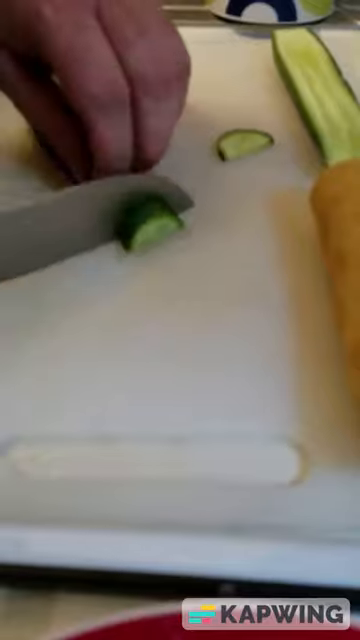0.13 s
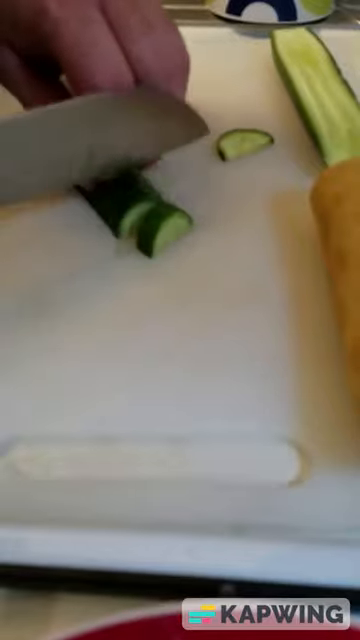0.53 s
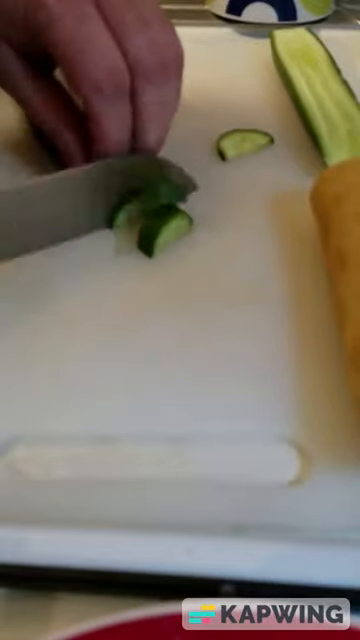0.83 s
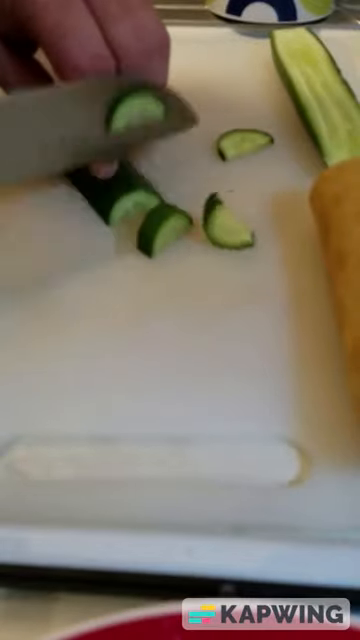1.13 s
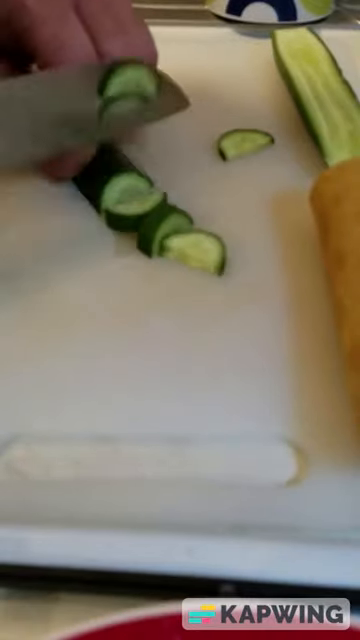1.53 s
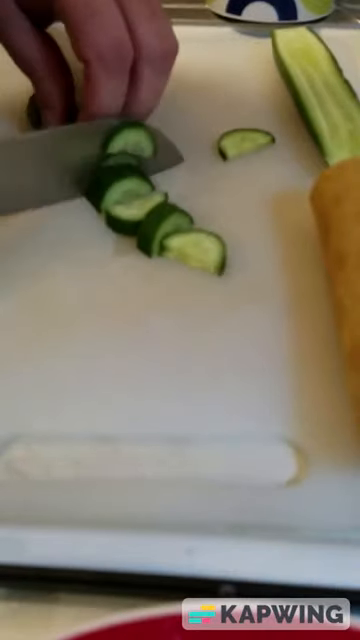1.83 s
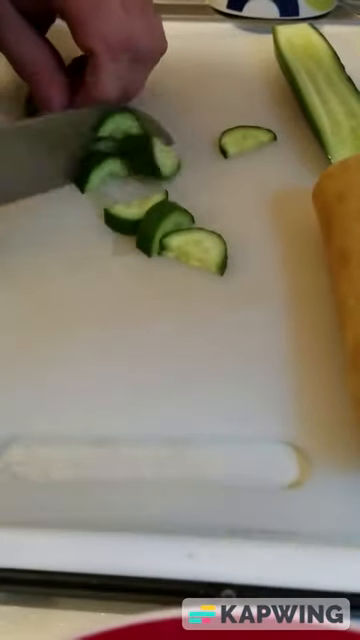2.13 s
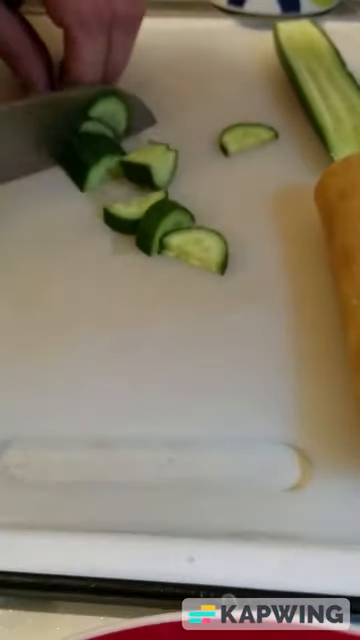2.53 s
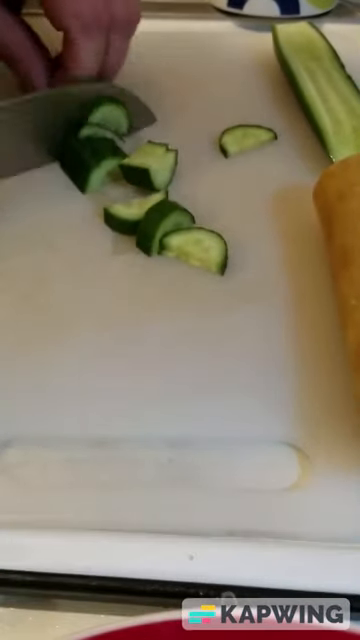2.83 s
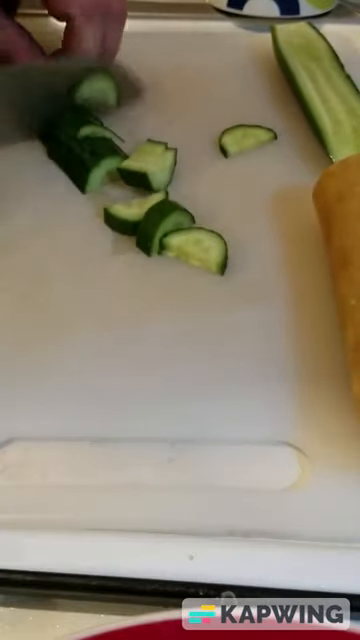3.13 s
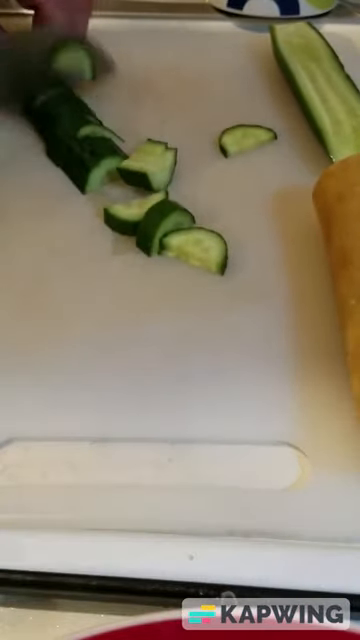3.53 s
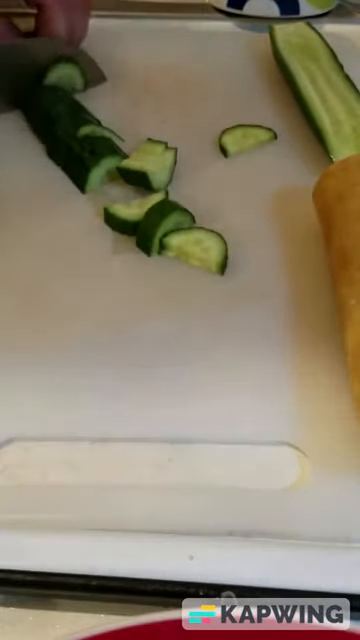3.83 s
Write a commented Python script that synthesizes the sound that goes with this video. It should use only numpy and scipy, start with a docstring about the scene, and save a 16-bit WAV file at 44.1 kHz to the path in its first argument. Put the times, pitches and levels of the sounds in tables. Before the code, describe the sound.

Knife strokes through cucumber land on a plastic cutting board with sharp woody knocks and soft low thumps, speeding up, with crunchier skin snaps later; close stereo microphones, small room, very faint hush.

```python
"""A kitchen knife chops a cucumber on a plastic board, twenty-one strokes that speed up. In each stroke grainy
noise slices crisply through the flesh, with a short soft tock on the board, then clicks, decaying modes and
ringing noise knock on the board, and more grainy noise snaps the last skin. A low sine thumps on the counter, a
small kitchen of decaying noise rings after it, and the blade skims and touches lightly between strokes over a
faint hush."""
import sys
import numpy as np
from scipy import signal
from scipy.io import wavfile

SR = 44100
rng = np.random.default_rng(int(sys.argv[2]) if len(sys.argv) > 2 else 0)


def output_pcm(signal):
    """Save a mono or channel-first signal as 16-bit PCM at the path in sys.argv[1].

    Samples are clipped to [-1, 1] before scaling.
    """
    pcm = np.clip(np.atleast_2d(signal).T, -1, 1) * 32767
    wavfile.write(sys.argv[1], SR, np.round(pcm).astype(np.int16))


N = 176400
AGE = np.arange(int(.4 * SR)) / SR  # seconds since a sound began


def from_db(db):
    """Decibels to gain."""
    return 10 ** (np.asarray(db) / 20)


def at_hz(table, hz, axis=1):
    """Read a table's column on a log-frequency axis."""
    table = np.array(table)
    return np.interp(np.log(hz), np.log(table[:, 0]), table[:, axis])


def decay(t60):
    """Exponential fall by 60 dB in t60 seconds."""
    return np.exp(-np.log(1000) * AGE / t60)


def rise(seconds):
    """Smooth attack with this time constant."""
    return 1 - np.exp(-AGE / seconds)


def swell(length):
    """A bell-shaped level that peaks halfway through the length in seconds."""
    return np.exp(-(2 * AGE / length - 1) ** 2)


def tone(hz, lag=0):
    """A sine, held back by lag radians."""
    return np.sin(2 * np.pi * hz * AGE - lag)


def add(track, s, sound):
    """Mix a sound in at time s."""
    i = int(s * SR)
    track[:, i:i + len(AGE)] += sound[..., :max(N - i, 0)]


def delayed(x, seconds):
    """The same signal, later."""
    i = np.arange(len(x))
    return np.interp(i - np.round(seconds * SR), i, x, left=0)


def highpass(x, order, hz):
    """Remove what lies below hz; the tiny offset keeps the filter out of denormal numbers."""
    return signal.sosfilt(signal.butter(order, hz, "high", fs=SR, output="sos"), x + 1e-18)


# How alike left and right are in scattered sound. Each row: frequency in Hz, correlation.
LEFT_RIGHT_LIKENESS = [(35, -1), (120, 0.75), (300, 0.81), (580, 0.79), (800, 0.39), (1150, -0.38),
                       (1900, -0.074), (4000, -.05), (12000, 0.48)]


def noise_bands(spectrum, size):
    """Bands of stereo noise, about half an octave wide, as (Hz, band), together of rms 1."""
    edges = np.geomspace(30, 17000, 20)
    centres = np.sqrt(edges[1:] * edges[:-1])
    power = from_db(at_hz(spectrum, centres)) ** 2 * np.diff(edges)
    white = rng.standard_normal((2, 2, size))
    bands = []
    for k, hz in enumerate(centres):
        bandpass = signal.butter(2, edges[k:k + 2], "band", fs=SR, output="sos")
        mid, side = signal.sosfilt(bandpass, white[k % 2])  # neighbours use separate noise
        alike = np.clip(at_hz(LEFT_RIGHT_LIKENESS, hz), -1, 1)
        band = np.sqrt(1 + alike) * mid + np.sqrt(1 - alike) * side * [[1], [-1]]
        bands.append((hz, band / band.std() * np.sqrt(power[k] / power.sum())))
    return bands


def noise(spectrum):
    """Steady stereo noise, long enough for a last stroke to ring out."""
    return sum(band for _, band in noise_bands(spectrum, N + len(AGE)))


def piece(x, s):
    """One stroke's length of a signal, from time s."""
    return x[:, int(s * SR):int(s * SR) + len(AGE)]


def grains(spread_db):
    """Cells burst at random, each with its own strength, over a smooth rub; rms 1."""
    grains_per_s, grain_s, smooth_share = 1100, 0.00058, .45
    sizes = from_db(spread_db * np.clip(rng.standard_normal(len(AGE)), -2.5, 2.5))
    bursts = sizes ** 2 * (rng.random(len(AGE)) < grains_per_s / SR)
    power = signal.lfilter([1], [1, -np.exp(-2 / (grain_s * SR))], bursts + 1e-18)
    return np.sqrt(smooth_share + (1 - smooth_share) * power / power.mean())


def lean_left(x):
    """Set a cutting sound slightly to the left, by half a dB up and half a dB down."""
    return x * from_db([[0.5], [-0.5]])


# Spectrum of the background hush. Each row: frequency in Hz, relative density in dB per Hz.
HUSH_SPECTRUM = [(30, -21), (55, 10.5), (130, 2), (300, 7.5), (1000, -31), (4000, -27.5), (14000, -20)]


def hush():
    """Steady, mostly low noise that fades in just before the first stroke."""
    level_db, start_s, fade_s = -58, .13, .04
    fade = np.clip((np.arange(N) / SR - start_s) / fade_s, 0, 1)
    return from_db(level_db) * noise(HUSH_SPECTRUM)[:, :N] * fade


# The strokes, for slices, knocks, thumps and crunches; each layer adds its own gain to the levels.
# Each row: time of the knock in seconds, slicing before it in seconds, slice level in dB, thump level in dB,
# knock level in dB in its deep, low, mid and high band, crunch level in dB, pitch of the edge's click in Hz.
STROKES = [(0.1546, 0.0039, -39.5, -43, -33, -26, -25.5, -28, -64, 1304),
           (0.4053, 0.014, -42.5, -37, -24.5, -23, -20.5, -24.5, -43.5, 1280),
           (0.6321, 0.015, -43, -37, -24.5, -23.5, -18, -22, -41.5, 1340.0),
           (0.8416, 0.016, -41.5, -46, -24, -21.5, -19.5, -20, -37.5, 1350),
           (1.0405, 0.014, -41, -43.5, -24.5, -25.5, -19.5, -26, -42, 1140),
           (1.2592, 0.018, -44.5, -41, -24, -19.5, -18, -18.5, -37.5, 1470),
           (1.4514, 0.02, -42, -41, -27.5, -26.5, -20.5, -23.5, -44, 1500.0),
           (1.6293, 0.016, -42.5, -42, -27, -29.5, -18.5, -24, -39, 1500),
           (1.821, 0.016, -37.5, -41, -26.5, -23.5, -18.5, -23, -35.5, 1560.0),
           (1.9923, 0.02, -39, -41, -26.5, -26, -19, -23, -36, 1500),
           (2.178, 0.029, -44, -43.5, -33.5, -28.5, -20.5, -26, -39.5, 1090),
           (2.3438, 0.016, -38.5, -41, -31, -25.5, -20.5, -21.5, -31, 970),
           (2.5455, 0.019, -42.5, -38.5, -30, -23, -20.5, -18.5, -32.5, 1320.0),
           (2.7154, 0.021, -40.5, -43.5, -35, -26, -21, -21, -32, 1170),
           (2.8652, 0.017, -38.5, -39, -32.5, -29.5, -22.5, -19.5, -32.5, 1160.0),
           (3.0279, 0.016, -46.5, -37, -30, -25, -19.5, -22, -31, 1180),
           (3.1935, 0.021, -37, -43, -34.5, -25, -24, -21, -33.5, 1150.0),
           (3.3564, 0.022, -37.5, -38.5, -36, -25.5, -23, -20.5, -36.5, 1240),
           (3.5128, 0.024, -37.5, -35.5, -33, -30, -21.5, -29, -38.5, 1070),
           (3.6693, 0.026, -38.5, -38.5, -29, -31.5, -20, -29.5, -37.5, 1060),
           (3.8198, 0.021, -35, -36.5, -32, -31, -19, -26, -42.5, 1130)]
# How far the right side trails in a mode or the soft tock. Each row: frequency in Hz, lag in radians.
RIGHT_SIDE_LAG = [(300, 0.21), (600, 0.46), (800, 0.81), (1100, 2.3), (2200, 1.7), (3000, 1.4)]
# Spectrum of flesh being cut. Each row: frequency in Hz, relative density in dB per Hz.
FLESH_SPECTRUM = [(100, -11), (200, -12), (350, 16), (700, 9), (1300, 10.5), (2400, 5.5), (4000, 0.5),
                  (8000, -7.5), (12000, -8.5), (15000, -2)]
SLICE_RISE_S, SLICE_GRAIN_SPREAD_DB = 0.0023, 1.5
CRUNCH_RISE_S = 0.0036


def slices():
    """Flesh crackles as the blade goes through, and a soft tock sounds as the entering edge pushes the cucumber
    against the board."""
    slice_gain_db, tock_gain_db = 7, 4
    pierce_gain, pierce_t60_s = 0.69, 0.027  # the upper skin gives way at the start
    tock_hz, tock_t60_s = 880, 0.026
    out, flesh = np.zeros((2, N)), noise(FLESH_SPECTRUM)
    tock = tone(tock_hz, np.array([[0], [at_hz(RIGHT_SIDE_LAG, tock_hz)]]))
    tock = tock * decay(tock_t60_s) * rise(SLICE_RISE_S)
    pierce = 1 + pierce_gain * decay(pierce_t60_s)
    for s, length, slice_db, *_ in STROKES:
        add(out, s - length, from_db(tock_gain_db + slice_db) * tock)
        # the slice lasts a moment past the landing, while the crunch rises
        push = rise(SLICE_RISE_S) * pierce * (AGE < length + CRUNCH_RISE_S)
        crackle = piece(flesh, s) * grains(SLICE_GRAIN_SPREAD_DB)
        add(out, s - length, from_db(slice_gain_db + slice_db) * crackle * push)
    return lean_left(out)


def struck(band, fall):
    """A band of noise dying away, with the same energy at every blow."""
    ring = band * fall
    return ring * np.sqrt(np.mean(band ** 2) * np.mean(fall ** 2) / np.mean(ring ** 2))


def edge_click(hz, level_db):
    """The edge lands as a short decaying tone; the rest of the edge lands a moment later."""
    gain_db, t60_s, heel_db = 18, 0.0062, -4.5
    heel_s, heel_spread_s, right_lag_s = .007, 0.001977, .0003
    click = -from_db(gain_db + level_db) * tone(hz) * decay(t60_s)
    heel = delayed(click, heel_s + heel_spread_s * rng.standard_normal())
    click = click + from_db(heel_db) * heel
    return np.array([click, delayed(click, right_lag_s)])


# Centres in Hz of the knock's deep, low, mid and high band.
BAND_CENTRES_HZ = [304, 528, 800, 2800]
# Modes of board and blade. Each row: frequency in Hz, relative level in dB, t60 in seconds.
BOARD_MODES = [(288, -1, 0.17), (385.7, -3, .15), (476.5, -0.5, 0.082), (559, -3.5, 0.17),
               (602.3, 1, 0.073), (746, -2.5, 0.04), (864.4, -0.5, 0.053), (1025, -6.5, 0.071),
               (1192, -15, 0.31), (1320, -5.5, 0.098), (1560, 5, 0.026), (1926, 0.5, 0.036),
               (2093, -15, 0.041), (2890, -19.5, 0.057)]
# The board's crowd of weaker modes. Each row: frequency in Hz, relative density in dB per Hz, t60 in seconds.
BOARD_RING = [(60, -55, .12), (180, -21.5, .12), (280.4, 0.5, 0.23), (511, 3.5, 0.12), (1010, -7, 0.15),
              (1500, -7.5, 0.078), (2090, 0.5, 0.065), (3050, -15, 0.098), (4380, -40, 0.26),
              (9000, -64, 0.076)]


def knocks():
    """The edge meets the board: two clicks, then modes and noise ring, coloured by the place of the blow."""
    modes_gain_db, mode_scatter_db, ring_gain_db, ring_rise_s = 2.5, 2.7, 10.5, 0.00081
    pitch_scatter = 0.01754  # share of the pitch: the blade presses at another place each time
    board_low_hz = 234  # the knock is kept clear of rumble below this
    out = np.zeros((2, N))
    crowd = []
    for hz, band in noise_bands(BOARD_RING, N + len(AGE)):
        crowd.append((hz, band, decay(at_hz(BOARD_RING, hz, axis=2))))
    modes = []
    for k, (hz, db, t60) in enumerate(BOARD_MODES):
        fall = from_db(db) * (-1) ** k * decay(t60)  # neighbours start in opposite directions
        modes.append((hz, fall, np.array([[0], [at_hz(RIGHT_SIDE_LAG, hz)]])))
    for s, _, _, _, deep_db, low_db, mid_db, high_db, _, click_hz in STROKES:
        colour = list(zip(BAND_CENTRES_HZ, (deep_db, low_db, mid_db, high_db)))
        body = 0
        for hz, band, fall in crowd:
            body = body + from_db(ring_gain_db + at_hz(colour, hz)) * struck(piece(band, s), fall)
        scatter = rng.standard_normal((len(modes), 2))
        for (hz, fall, lag), (strength, detune) in zip(modes, scatter):
            level_db = modes_gain_db + at_hz(colour, hz) + mode_scatter_db * strength
            body = body + from_db(level_db) * tone(hz * (1 + pitch_scatter * detune), lag) * fall
        click = edge_click(click_hz, (mid_db + high_db) / 2)
        add(out, s, click + body * rise(ring_rise_s))
    return highpass(out, 4, board_low_hz)


def thumps():
    """The board thumps on the counter: a low sine, its pitch a little different at each stroke."""
    pitch_hz, pitch_scatter, gain_db = 137.5, 0.15, 10.5
    t60_s, rise_s = 0.096, 0.012
    low_hz = 55  # the thump is kept clear of rumble below this
    out = np.zeros((2, N))
    for s, _, _, thump_db, *_ in STROKES:
        hz = pitch_hz * np.exp(pitch_scatter * rng.standard_normal())
        add(out, s, from_db(gain_db + thump_db) * tone(hz) * decay(t60_s) * rise(rise_s))
    return highpass(out, 2, low_hz)


# Spectrum of snapping skin. Each row: frequency in Hz, relative density in dB per Hz.
SKIN_SPECTRUM = [(1000, 5), (2500, 10), (3500, 4), (5000, 3), (8500, -1.5), (11500, -3), (15000, -9)]


def crunches():
    """The lower skin snaps as the blade lands: bright grainy noise that dies away."""
    gain_db, t60_s, grain_spread_db = 13, 0.12, 2
    out, skin = np.zeros((2, N)), noise(SKIN_SPECTRUM)
    shape = rise(CRUNCH_RISE_S) * decay(t60_s)
    for s, *_, crunch_db, _ in STROKES:
        add(out, s, from_db(gain_db + crunch_db) * piece(skin, s) * grains(grain_spread_db) * shape)
    return lean_left(out)


# The kitchen's reflections. Each row: frequency in Hz, relative density in dB per Hz, t60 in seconds.
KITCHEN = [(100, 3.5, 0.19), (287, -2, 0.46), (590, 1, 0.31), (1150, 1.5, 0.3), (1840, -2, 0.31),
           (2700, 2, 0.3), (5600, 1.5, 0.29), (12900, 1.5, 0.22)]


def kitchen(x, count=4):
    """Reflections build up quickly and die away by band; four noise tails are dealt to the strokes in turn."""
    level_db, delay_s, rise_s = -12, .006, 0.0079
    starts = [s - length for s, length, *_ in STROKES]
    stroke = np.searchsorted(starts, np.arange(N) / SR)
    out = 0
    for k in range(count):
        bands = noise_bands(KITCHEN, len(AGE))
        tail = sum(band * decay(at_hz(KITCHEN, hz, axis=2)) for hz, band in bands) * rise(rise_s)
        tail = tail / np.sqrt(np.sum(tail ** 2) / 2)  # unit energy per side on average
        sent = delayed(x * (stroke % count == k), delay_s)
        out = out + signal.fftconvolve(sent[None], tail, axes=1)[:, :N]
    return from_db(level_db) * out


def skim():
    """The blade skims the cucumber before the second stroke: a brief rub sets the steel singing."""
    s, length_s, level_db = 0.3506, 0.034, -50
    steel_hz, width_hz, steel_db = [1800, 2700, 5600], 220, 9
    out = np.zeros((2, N))
    rub = sum(band for _, band in noise_bands(SKIN_SPECTRUM, len(AGE))) * swell(length_s)
    steel = 0
    for hz in steel_hz:
        steel = steel + signal.lfilter(*signal.iirpeak(hz, hz / width_hz, fs=SR), rub + 1e-18)
    add(out, s, from_db(level_db) * (rub + from_db(steel_db) * steel))
    return out


# Light touches of the blade and the slices. Each row: start in seconds, length in seconds, level in dB.
LIGHT_TOUCHES = [(0.77, .008, -72), (2.095, 0.0044, -44.5), (3.29, 0.0066, -40.5), (3.932, 0.0041, -47.5)]


def touches():
    """Blade and slices touch lightly: very short swells of grainy flesh and skin noise."""
    out = np.zeros((2, N))
    rub = noise(FLESH_SPECTRUM) + noise(SKIN_SPECTRUM)
    for s, length, db in LIGHT_TOUCHES:
        add(out, s, from_db(db) * piece(rub, s) * grains(SLICE_GRAIN_SPREAD_DB) * swell(length))
    return lean_left(out)


def scene():
    """The board lies close to the microphones, with the kitchen behind it."""
    near = slices() + knocks() + thumps() + crunches() + skim() + touches()
    return hush() + near + kitchen(near[0])


def record(dry):
    """Peaks are rounded and the top is cut."""
    cutoff_hz = 14650
    rounded = 1.259 * np.tanh(dry / 1.31)
    return signal.sosfilt(signal.ellip(10, .1, 80, cutoff_hz, fs=SR, output="sos"), rounded)


dry = scene()
out = record(dry)
output_pcm(out)
```